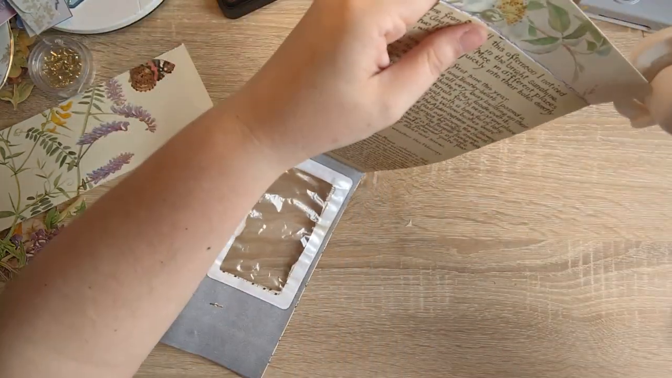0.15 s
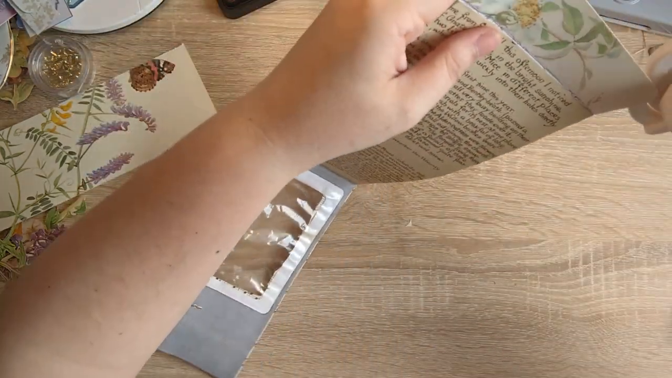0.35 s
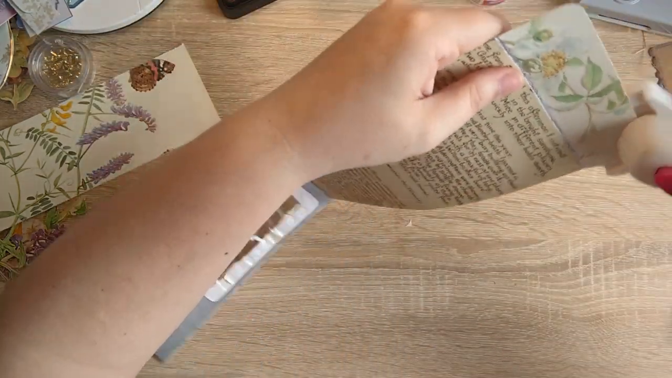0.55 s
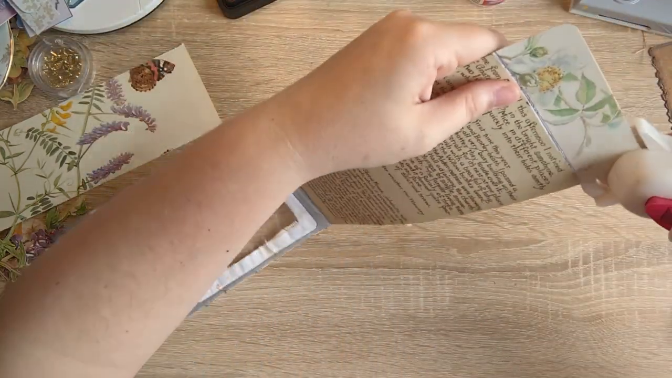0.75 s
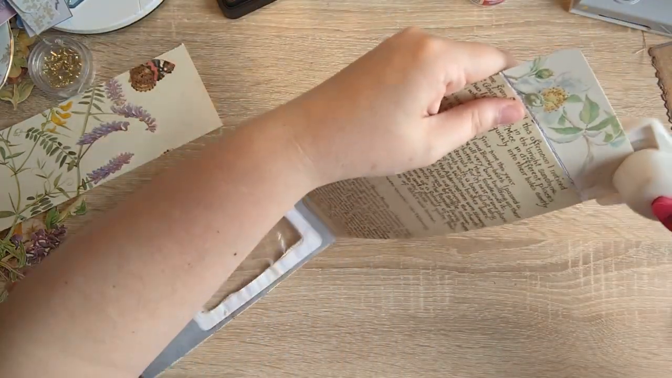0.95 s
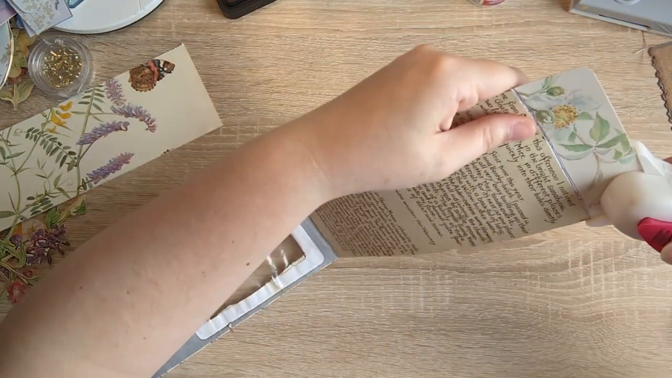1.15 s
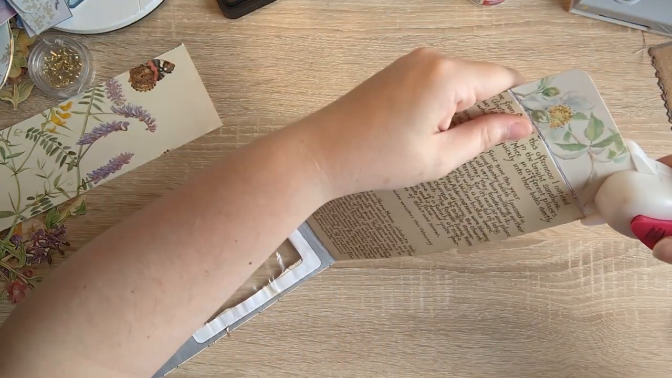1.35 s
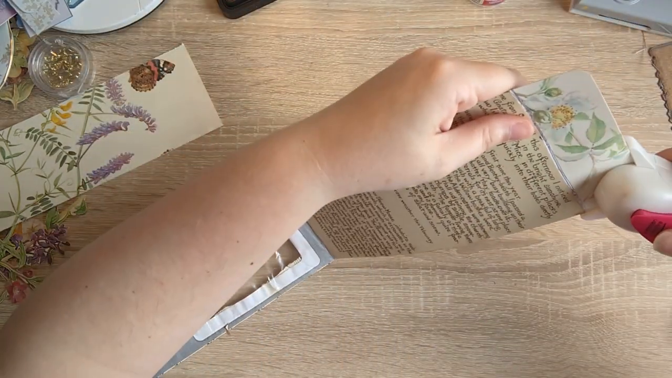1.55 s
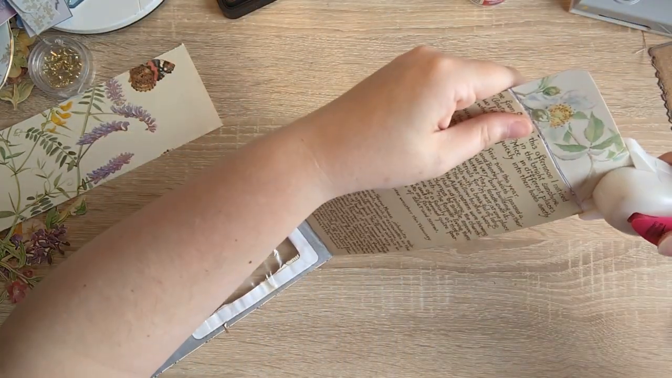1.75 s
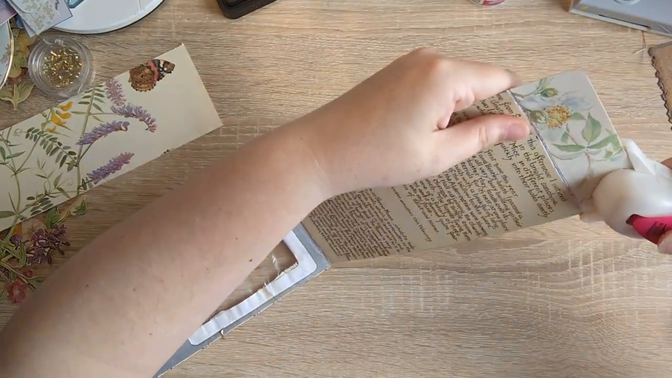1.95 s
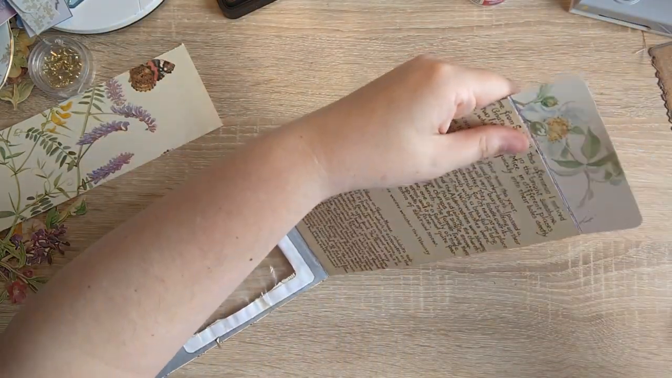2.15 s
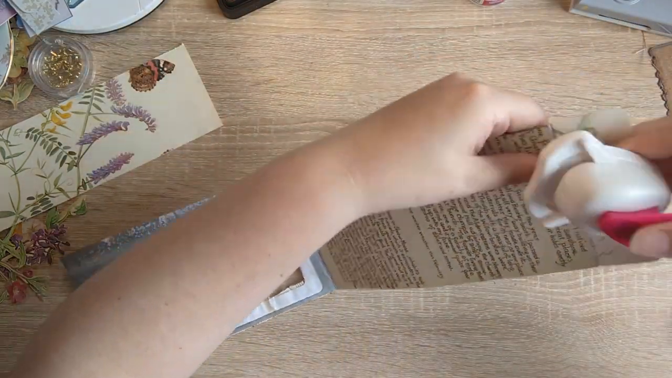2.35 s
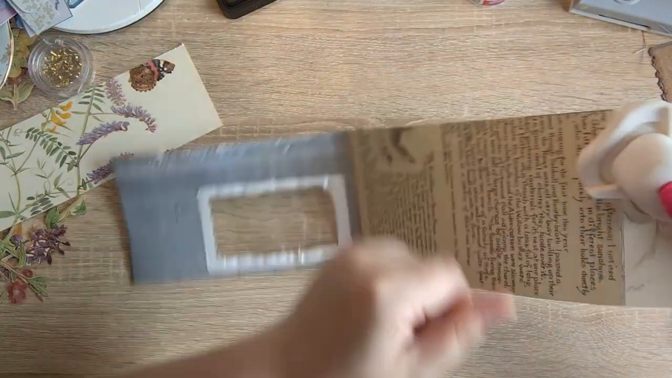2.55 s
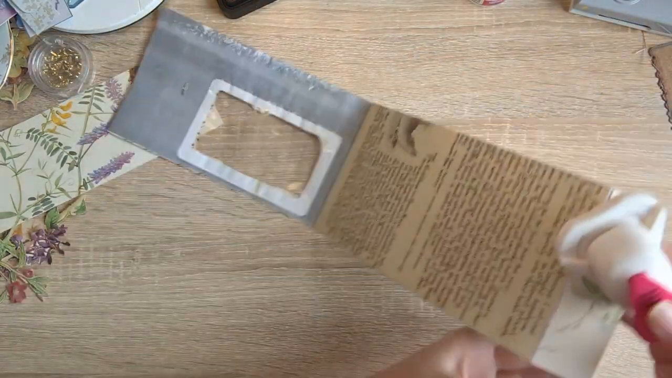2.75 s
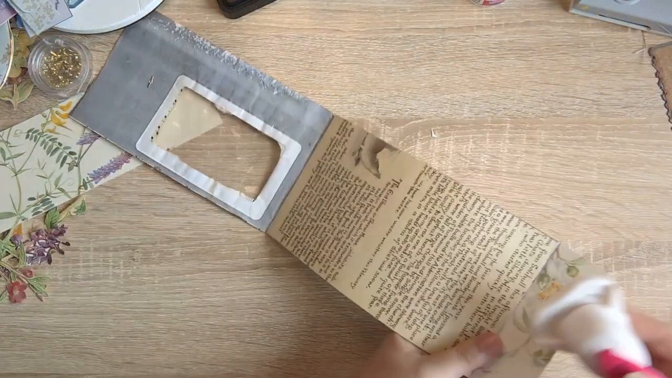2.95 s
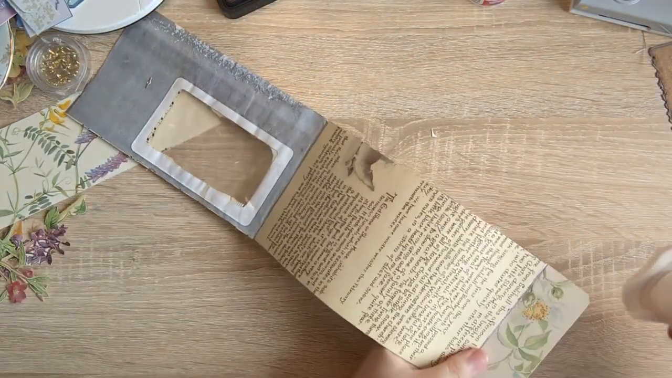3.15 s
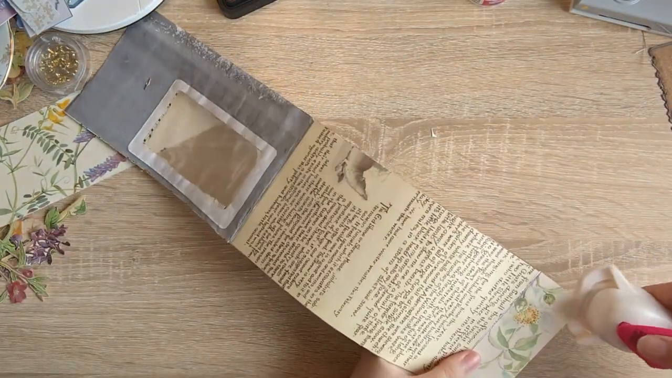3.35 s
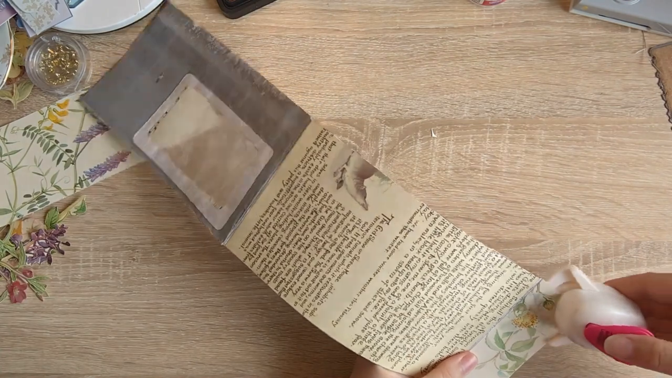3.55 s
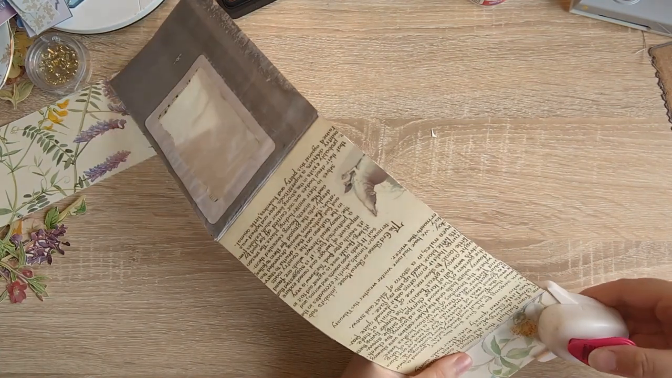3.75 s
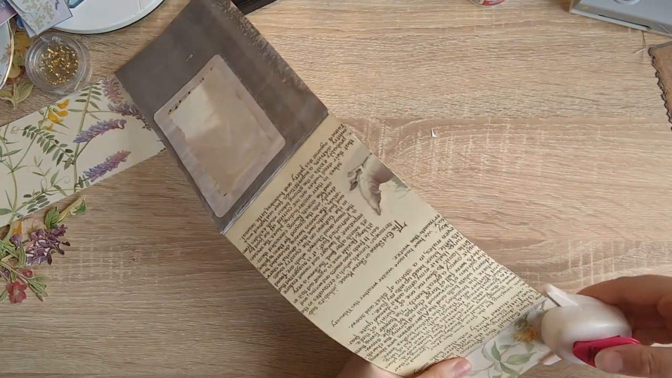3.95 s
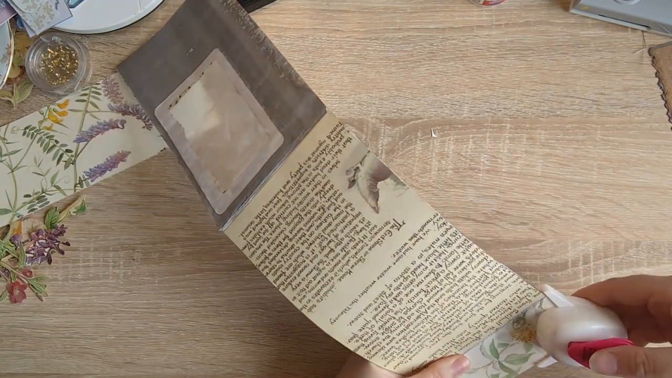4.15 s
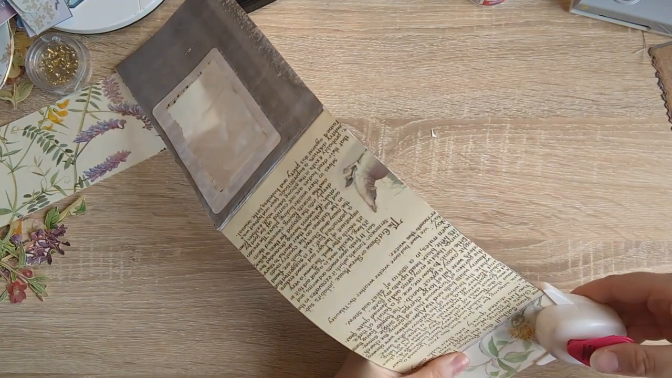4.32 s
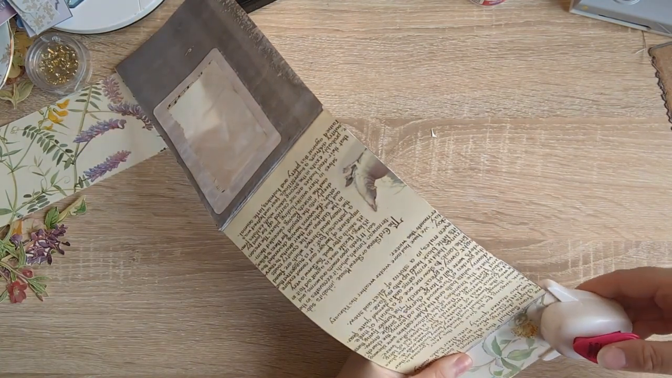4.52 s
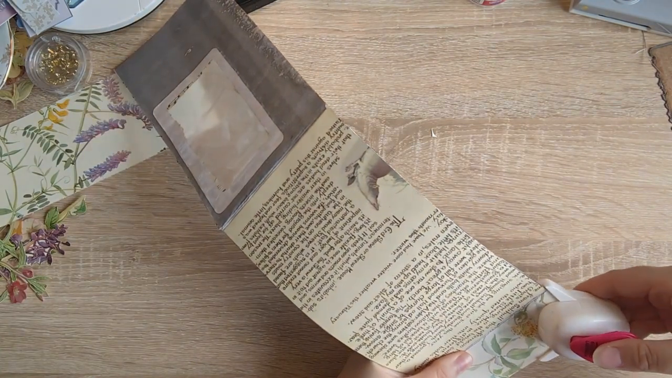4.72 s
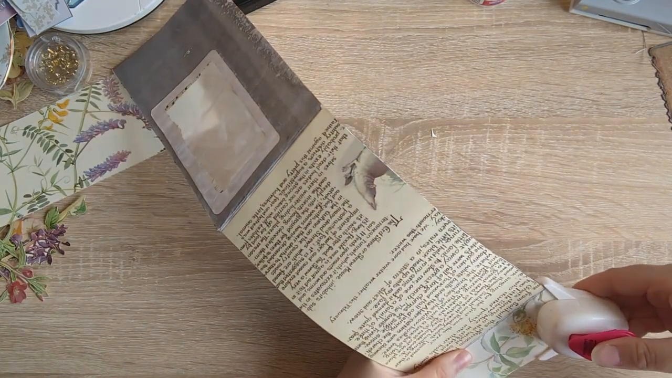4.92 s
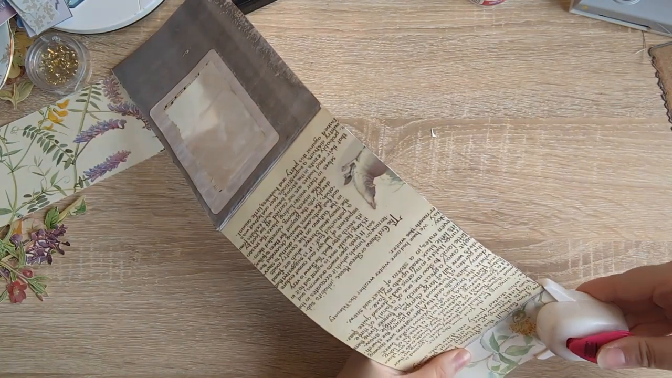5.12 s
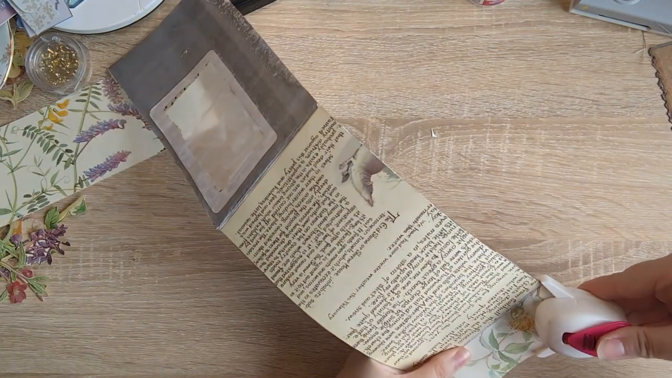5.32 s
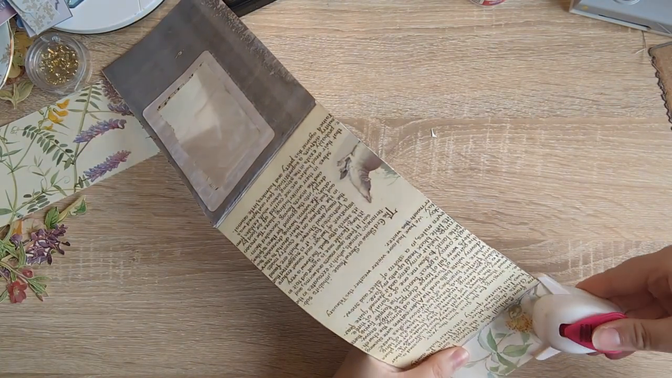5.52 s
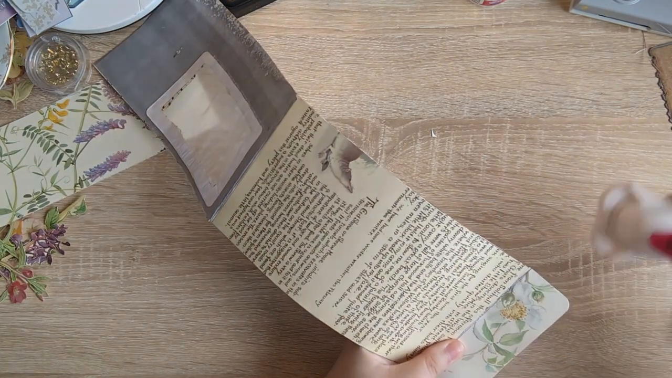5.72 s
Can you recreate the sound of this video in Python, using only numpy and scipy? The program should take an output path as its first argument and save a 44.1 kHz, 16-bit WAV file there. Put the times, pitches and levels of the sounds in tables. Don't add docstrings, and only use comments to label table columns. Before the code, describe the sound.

Close at a desk, stiff paper is fiddled into a plastic punch, clacked loudly, turned with papery snaps, then clacked once more.

```python
import sys
import numpy as np
from scipy import signal
from scipy.fft import rfft, irfft
from scipy.io import wavfile

SR = 44100
rng = np.random.default_rng(int(sys.argv[2]) if len(sys.argv) > 2 else 0)


def ratio(d):
    e = np.asarray(d, float) / 20
    return 10 ** e


def unload_wav(signal):
    wavfile.write(
        sys.argv[1],
        SR,
        np.round(np.clip(np.atleast_2d(signal).T, -1, 1) * 32767).astype(np.int16),
    )


N = 259308

# [t/s, crack level/dB, level beamed at the microphone/dB rel, desk thud/dB rel, crack length/ms]
CUTS = [
    (1.9126, 13, -2.5, -56, 2.1),
    (5.3975, 16, -10.5, -70, 1.12),
]
# [f/Hz, width/Hz, level/dB]
BODY_MODES = [(1750, 680, -2.5), (2250, 790, 0.5), (2740, 640, -1), (3770, 930, -7), (6460, 1900, -8.5)]
# [f/Hz, width/Hz, level/dB]
BLADE_MODES = [(8900, 1400, 0), (11520, 5500, -1), (15400, 1500, 0)]
# [f/Hz, level/dB per Hz]
SHEET_SPECTRUM = [(500, -44.5), (900, -12), (1800, 4), (2400, 4.5), (4200, -6), (5500, -37.5)]
# [f/Hz, level/dB per Hz]
RASP_SPECTRUM = [(2500, -41.5), (4200, -11.5), (5500, -12), (6800, -5.5), (8200, -23.5), (12000, -10.5),
                 (14500, -17), (16000, -13.5)]
# [f/Hz, level/dB per Hz]
HUSH_SPECTRUM = [(15, -82.5), (25, -12), (64, -1), (102, -4.5), (127, -6), (263, -16.5), (363, -14.5),
                 (516, -17), (863, -19), (1230, -8.5), (8140, -17.5), (9840, -16), (16000, -22.5)]
# [f/Hz, t60/s, level/dB]
ROOM_DECAY = [(153, 0.02, 3.5), (460, 0.21, 1.5), (1410, 0.18, 1.5), (3630, 0.22, 0.5), (10000, 0.21, 1),
              (13900, 0.17, 3.5)]
# [t/s, peak level/dB, f/Hz, length/ms]
KNOCKS = [(0.144, -39, 338, 3.2), (0.643, -21.5, 894, 2.3), (0.891, -36.5, 462, 16),
          (0.945, -41.5, 313, 5.5), (1.033, -36.5, 310, 4.8), (1.066, -35.5, 450, 6.7),
          (1.199, -29.5, 295, 6), (1.25, -36, 443, 17), (1.912, -23, 754, 3.5), (1.925, -18.5, 838, 6),
          (2.126, -45, 347, 1.2), (2.177, -50, 450, 4), (2.45, -45.5, 306, 5.3), (2.465, -40, 313, 1.4),
          (2.995, -53, 660, 2.7), (3.033, -42, 794, 4), (3.524, -46.5, 790, 4.9), (3.54, -40, 720, 8.9),
          (3.642, -26.5, 535, 0.63), (3.679, -35, 620, 3.2), (3.746, -32.5, 418, 2.3),
          (3.823, -47.5, 676, 3.9), (3.997, -47, 726, 6), (4.049, -49, 840, 4.5), (4.202, -42.5, 484, 0.37),
          (4.81, -22, 900, 3.9), (5.401, -22.5, 422, 2.8), (5.475, -38.5, 467, 2.7), (5.666, -44, 600, 5.2),
          (5.73, -50.5, 352, 3), (5.761, -47, 375, 6.5), (5.774, -43, 570, 3),
          (0.146, -36.5, 850, 2.6), (0.164, -47.5, 587, 1.3), (0.643, -31.5, 415, 3.7), (0.79, -49, 366, 9),
          (1.917, -22, 305, 2.8), (1.94, -25.5, 820, 7.1), (3.40, -50, 840, 8.7), (4.205, -48, 306, 1.5),
          (4.809, -36.5, 436, 3.4), (5.409, -27, 363, 8.2), (5.476, -34.5, 700, 3)]
# [t/s, peak level/dB, f/Hz, length/ms]
DESK_KNOCKS = [(0.639, -44, 145, 6), (0.889, -52.5, 151, 4), (0.947, -43.5, 159, 3.2),
               (1.033, -40.5, 158, 4.6), (1.069, -45.5, 130, 3.5), (1.197, -38, 174, 2),
               (1.243, -40.5, 142, 3.3), (1.922, -35, 200, 12), (1.958, -44, 214, 14),
               (3.747, -49, 221, 3.3), (4.814, -56, 168.2, 14), (5.403, -49.5, 181, 8)]
# [start t/s, end t/s, f/Hz, width/Hz, level/dB]
SPRING_GLIDES = [
    (0.097, 0.132, 8900, 320, -71),
    (0.284, 0.337, 8800, 355, -69),
    (.43, 0.55, 8900, 350, -75),
    (4.809, 4.9, 6160, 400, -53),
]
# [t/s, peak level/dB, crackle/dB rel, ring f/Hz, length/ms]
SEATING = [(0.0014, -48, -26, 2100, 4.4), (0.1455, -26, -21.5, 2580, 4.3), (0.145, -33.5, -23, 1300, 3),
           (0.2722, -36, -24, 2280, 1.2), (0.4388, -41, -29, 1760, 2.8), (0.587, -42, -25, 1750, 3.8),
           (0.6401, -25, -29.5, 1960, 3.2), (0.6426, -16.5, -32, 2080, 1.1), (0.711, -40, -15, 1760, 3.0),
           (0.723, -32.5, -15.5, 1600, 4.3), (0.7625, -50, -7, 2400, 2.5), (0.784, -26.5, -22.5, 1740, 5.1),
           (0.799, -37, -10, 2000, 4.8), (0.804, -34, -23, 2090, 1.7), (0.8222, -32.5, -13, 2380, 4.1),
           (0.830, -35, -9, 2500, 2.9), (0.8939, -18, -20, 1300, 2.5), (0.915, -23, -10, 1990, 3.3),
           (0.9479, -25, -14.5, 1610, 0.99), (0.967, -29.5, -23, 2190, 3.5),
           (1.0361, -17, -18.5, 1740, 3.2), (1.069, -25.5, -38, 1180, 3.1), (1.0687, -14, -21, 1914, 3.64),
           (1.1922, -29.5, -17.5, 2130, 3.7), (1.2008, -17, -21.5, 1510, 3.1),
           (1.242, -26.5, -3, 2500, 0.56), (1.252, -14.5, -35, 1640, 1.3), (1.2942, -23, -12, 2240, 3.65),
           (1.322, -32.5, -15, 2100, 6.7), (2.1249, -36, -12.5, 1670, 2.8), (2.176, -53.5, -8.5, 1186, 4.1),
           (2.23, -50.5, -12, 2260, 3.2), (2.326, -49.5, -17, 1560, 2.5)]
# [t/s, peak level/dB, crackle/dB rel, ring f/Hz, length/ms]
TURNING = [(2.4516, -45, -22, 1720, 2.5), (2.467, -34.5, -11, 1630, 2.1), (2.475, -32.5, -23, 1980, 1.8),
           (2.500, -35.5, -20.5, 2240, 4.9), (2.531, -34, -17, 2220, 4), (2.536, -28.5, -20, 2060, 1.2),
           (2.57, -38.5, -15.5, 2670, 2.5), (2.587, -47.5, -16, 2900, 4.3), (2.644, -31.5, -17, 2350, 8.3),
           (2.651, -38, -11, 2320, 2.7), (2.655, -28.5, -12.5, 2360, 2), (2.7031, -22, -18, 2300, 2.6),
           (2.764, -46, -11, 3290, 4.5), (2.8, -40, -2.5, 3120, 2.1), (2.839, -42, -4, 2820, 2.8),
           (2.8855, -36.5, -11.5, 2530, 3.3), (2.906, -32, -11.5, 3070, 3.3),
           (2.98, -41.5, -4.5, 3400, 3.1), (3.0074, -33.5, -24, 2500, 1.2), (3.032, -46, -20, 990, 1.9),
           (3.043, -42, -17, 1500, 1), (3.048, -26, -12.5, 2230, 0.32), (3.0741, -22, -15.5, 3100, 2.46),
           (3.084, -36, -17, 2570, 3.6), (3.118, -45, -14, 3620, 0.6), (3.135, -23.5, -18.5, 2900, 2.2),
           (3.1388, -22.5, -10.5, 3080, 2.6), (3.1452, -37, -12, 3280, 2.6), (3.158, -57, -15, 3300, 1.5),
           (3.1805, -40.5, -10, 3320, 1.4), (3.212, -38, -44, 3170, 6.1), (3.2252, -25, -13.5, 2930, 0.5),
           (3.2382, -36.5, -7, 3340, 2.3), (3.3464, -28.5, -19.5, 2080, 3.1), (3.414, -39, -14, 2300, 2.7),
           (3.457, -41.5, -23, 2720, 2.1), (3.4988, -39, -27, 1630, 2.6)]
# [t/s, peak level/dB, crackle/dB rel, ring f/Hz, length/ms]
RESEATING = [(3.525, -29.5, -23, 1780, 2), (3.6423, -15, -32.5, 2020, 1.85), (3.668, -46, -4, 2200, 3.3),
             (3.6807, -34, -17, 1940, 2.5), (3.728, -31, -17.5, 2020, 6.2), (3.746, -17, -29, 2160, 1.9),
             (3.7515, -31, -15, 2430, 1.7), (3.764, -39, -28, 2480, 1.1), (3.811, -40.5, -12.5, 2250, 4.9),
             (3.8236, -33.5, -11.5, 1740, 3.9), (3.838, -42, -4, 1800, 2.1),
             (3.906, -36.5, -21, 1710, 0.58), (3.969, -49, -22, 1750, 1.1),
             (3.991, -38.5, -14.5, 1680, 2.9), (4.048, -39.5, -22.5, 1920, 4.5),
             (4.0842, -32, -17.5, 1800, 2.2), (4.139, -59, -30, 1560, 2.0),
             (4.2022, -23.5, -21.5, 1230, 1.4), (4.208, -26.5, -20, 1780, 2.8),
             (4.23, -35.5, -11, 1750, 1.7), (4.233, -43, -14, 1450, 2), (4.248, -44.5, -15, 1600, 1.5),
             (4.4825, -33.5, -17, 2510, 2), (4.8081, -17.5, -23, 1410, 2.16), (4.874, -46, -30, 1700, 1.1),
             (4.908, -44, -35, 1850, 2), (5.118, -55, -28.5, 1640, 5.2), (5.155, -53, -21.5, 1900, 3),
             (5.617, -49, -35, 1490, 1.3), (5.627, -42.5, -27, 1290, 1.54), (5.6678, -21, -29.5, 1900, 3.2),
             (5.674, -37, -35, 1900, 2.1), (5.748, -32.5, -14, 2220, 1.5), (5.791, -25.5, -17.5, 1880, 4),
             (5.811, -40.5, -8.5, 1830, 3.5), (5.8568, -41, -12, 2450, 1.2)]
STAGE_PAN_DB = (2.0, 4, 3.2)
# [start t/s, end t/s, sheet level/dB, rasp/dB rel, drag/dB rel]
STROKES = [(0.092, 0.608, -67.5, -4, -13.5), (0.611, 0.726, -58, -4.5, -30), (0.807, 0.81, -47, -5, -12),
           (0.873, 1.057, -60.5, -1.5, -23), (1.08, 1.087, -63.5, 18, -9), (1.21, 1.29, -45, -7.5, -13),
           (2.094, 2.136, -50.5, -4.5, -7.5), (2.18, 2.45, -67.5, -4, -20), (2.46, 2.534, -59, -7, -9),
           (2.637, 2.985, -60, 3, -23), (2.972, 3.067, -58, -1.5, -4.5), (3.076, 3.137, -69, 8, 3),
           (3.433, 3.544, -59.5, -8.5, -6.5), (3.53, 3.63, -64, -12, 4), (3.656, 3.74, -57, 0, 6),
           (3.815, 3.896, -55.5, -17, -6), (3.936, 4.144, -60, -10.5, -10), (4.634, 4.698, -63, -7, -10),
           (4.813, 4.815, -50, -7, -9), (5.496, 5.6, -60, -18.5, -28), (5.728, 5.78, -46.5, -5, -11),
           (5.812, 5.86, -77, -7, -18)]
# Sheet, rasp and drag while the hands only hold on [level/dB]
AT_REST_DB = (-83.5, -80.5, -86)
# [start t/s, end t/s, level/dB]
SHAKES = [(0.175, 0.163, -68.5), (0.647, 0.71, -63), (0.788, 0.934, -67.5), (1.07, 1.1, -61.5),
          (1.222, 1.278, -58), (1.96, 2.015, -64.5), (2.146, 2.16, -63), (2.36, 2.374, -72),
          (2.468, 2.48, -59), (2.984, 3.086, -66.5), (3.53, 3.597, -65), (3.656, 3.787, -64.5),
          (3.974, 4.027, -69.5), (4.135, 4.137, -66.5), (4.22, 4.248, -67.5), (4.817, 4.824, -66),
          (5.437, 5.44, -58), (5.682, 5.69, -65.5), (5.757, 5.778, -65.5)]

FIRST_BREAK = 6.5


def rms_one(x):
    return x / np.sqrt(np.mean(x ** 2) + 1e-20)


def peak_one(x):
    return x / np.abs(x[0]).max()


def band(x, low_hz, high_hz):
    return signal.sosfilt(signal.butter(2, [low_hz, high_hz], "band", fs=SR, output="sos"), x)


def steep(x, low_hz, high_hz):
    return band(band(x, low_hz, high_hz), low_hz, high_hz)


def resonance(x, hz, width_hz):
    r = np.exp(-np.pi * max(width_hz, 20) / SR)
    feedback = [1, -2 * r * np.cos(2 * np.pi * hz / SR), r * r]
    return signal.lfilter(np.array([1, 0, -1]) * (1 - r * r) / 2, feedback, x)


def modes(blow, table):
    return sum((-1) ** k * ratio(db) * resonance(blow, hz, width_hz)
               for k, (hz, width_hz, db) in enumerate(table))


def coloured(x, spectrum):
    hz, level_db = np.transpose(spectrum)
    grid = np.maximum(np.fft.rfftfreq(N, 1 / SR), 1)
    gain = ratio(np.interp(np.log(grid), np.log(hz), level_db))
    return rms_one(irfft(rfft(x) * gain, N))


def drift(rate):
    r = np.exp(-2 * np.pi * rate / SR)
    return rms_one(signal.lfilter([1], [1, -2 * r, r * r], rng.standard_normal(N + SR))[SR:])


def gesture(start, end, level_db, rest_db, rise, fall):
    t = np.arange(0, N + 64, 64) / SR
    climb = rise * np.maximum(start[:, None] - t, 0)
    sink = fall * np.maximum(t - end[:, None], 0)
    each = level_db[:, None] - climb - sink
    return np.interp(np.arange(N) / SR, t, np.maximum(each.max(axis=0), rest_db))


def burst(noise, length_ms, rise_ms):
    ms = np.arange(len(noise)) * 1000 / SR
    first_break = 0.099 * np.exp(-ms / 0.16)
    decay = np.exp(-ms / max(length_ms, .2)) + first_break
    shower = noise * np.abs(noise) ** 0.34 * (1 - np.exp(-ms / rise_ms)) * decay
    even = 0.048 * shower
    even[0] = np.sqrt(np.sum(shower ** 2))
    return np.array([shower, even])


def add(out, s, x, pan_db=2.5):
    left_s = s + .00005 * (4.0 - pan_db / 2)
    sounds = [x[0] * ratio(pan_db / 2), x[0] * ratio(-pan_db / 2), x[1]]
    for row, sound, at in zip(out, sounds, [left_s, s, s]):
        i = round(at * SR)
        row[i:i + len(sound)] += sound[:N - i]


def background(rumble_db):
    common, left, right, *low = rng.standard_normal((6, N))
    shared = band(common, 25, 520)
    hush = np.array([coloured(shared + v - 0.36 * band(v, 17, 400), HUSH_SPECTRUM) for v in (left, right)])
    apart = np.array(low[1:])
    both = rms_one(band(low[0], 100, 170)) * ratio([[-1.5], [1.5]])
    middle = 0.95 * rms_one(band(apart, 55, 160))
    deep = 0.68 * rms_one(band(apart, 31, 96)) * ratio([[-8], [2.5]])
    rumble = ratio(rumble_db + 2.0 * drift(9)) * (both + middle + deep)
    return ratio(-65.5) * band(hush, 12, 13000) + rumble


def room(x):
    t, white = np.arange(SR // 2) / SR, rng.standard_normal((2, 2, SR // 2))
    hz, t60, level_db = np.transpose(ROOM_DECAY)
    edges, echoes = 60 * 2 ** np.arange(0, 8.3, .75), 0
    for k, (low, high) in enumerate(zip(edges, np.append(edges[1:], 19000))):
        centre = np.log(low * high) / 2
        start_db = np.interp(centre, np.log(hz), level_db)
        decay_db = 60 * t / np.interp(centre, np.log(hz), t60)
        mid, side = band(white[k % 2], low, high) * ratio(start_db - decay_db)
        alike = np.clip(1 - np.exp(centre) / 1100, 0, 1)
        echoes = echoes + np.sqrt(1 + alike) * mid + np.sqrt(1 - alike) * side * [[1], [-1]]
    echoes = echoes * np.clip((t - 0.001) / 0.0063, 0.05, 1)
    echoes = echoes / np.sqrt(np.sum(echoes ** 2) / 2)
    return signal.fftconvolve(x[None], echoes, axes=1)[:, :N]


def off_desk(x):
    desk = 0.04 * np.roll(x, round(0.0013 * SR), axis=1)
    wall = np.array([np.roll(side, round(lag_s * SR)) for side, lag_s in zip(x, (0.0068, 0.0064))])
    return x + desk + ratio(-15) * band(wall, 1100, 9000)


def spring():
    out, t = np.zeros(N), np.arange(N) / SR
    noise = rng.standard_normal(N)
    for start, end, pitch_hz, width_hz, level_db in SPRING_GLIDES:
        shape = np.interp(t, [start, start + 0.052 * (end - start), end], [0, 1, 0])
        squeak = resonance(resonance(noise, pitch_hz, width_hz), pitch_hz, 0.52 * width_hz)
        out += ratio(level_db) * shape * rms_one(squeak)
    return out


def rubbing(sheet_db, rasp_db, drag_db):
    clumps = ratio(2.5 * drift(25) + 2.5 * drift(80))
    born = rng.random(N) < 2500 * clumps / SR
    sizes = ratio(6.1 * np.minimum(rng.exponential(1, N), 3.0))
    grains = born * sizes * rng.choice([-1, 1], N)
    friction = clumps * (0.81 * rms_one(grains) + rng.standard_normal(N))
    sheet = ratio(sheet_db) * coloured(friction, SHEET_SPECTRUM)
    rasp = ratio(rasp_db + 2.5) * coloured(friction, RASP_SPECTRUM)
    drag = ratio(drag_db - 2) * rms_one(steep(friction, 420, 2300))
    return sheet + rasp + drag


def knocks():
    rows = KNOCKS + DESK_KNOCKS
    out, noise = np.zeros((3, N)), rng.standard_normal((len(rows), 3000))
    for (s, peak_db, pitch_hz, length_ms), grit in zip(rows, noise):
        blow = burst(grit, length_ms, 1.0) * ratio([[0], [-5]])
        hollow = resonance(resonance(blow, pitch_hz, .4 * pitch_hz), pitch_hz, .9 * pitch_hz)
        hollow = hollow + 0.077 * steep(blow, .5 * pitch_hz, 3.5 * pitch_hz)
        add(out, s - .001, ratio(peak_db - 0.5) * peak_one(hollow), pan_db=1.5)
    return out


def snaps():
    stages = zip([SEATING, TURNING, RESEATING], STAGE_PAN_DB)
    rows = [(*row, middling_pan_db) for table, middling_pan_db in stages for row in table]
    out, noise = np.zeros((3, N)), rng.standard_normal((len(rows), 2000))
    noise = np.clip(noise, -2, 2)
    noise[:, 26] = FIRST_BREAK
    for (s, peak_db, high_db, ring_hz, length_ms, middling_pan_db), grit in zip(rows, noise):
        pan_db = middling_pan_db - 0.52 * (peak_db + 30)
        blow = burst(grit, length_ms, 0.5 * length_ms) * ratio([[0], [-4]])
        ring = resonance(resonance(blow, ring_hz, 0.71 * ring_hz), ring_hz, 0.66 * ring_hz)
        ring = band(ring + 0.07 * steep(blow, 950, 5050), 610, 3020)
        crackle = band(band(blow, 2570, 19840), 3550, 13420)
        snap = peak_one(ring) + ratio(high_db + 17.5) * peak_one(crackle)
        add(out, s - .0006, ratio(peak_db + 1.5) * snap, pan_db)
    return out


def punch():
    out, noise = np.zeros((3, N)), rng.standard_normal((len(CUTS), 8000))
    noise = np.clip(noise, -2, 2)
    noise[:, 30] = .6 * FIRST_BREAK
    for (s, crack_db, beamed_db, thud_db, length_ms), grit in zip(CUTS, noise):
        blow = burst(grit, length_ms, 0.51)
        body = peak_one(band(modes(blow, BODY_MODES), 750, 14000))
        blade = peak_one(modes(blow, BLADE_MODES))
        crack = ratio([[beamed_db], [0]]) * (ratio(-6.5) * body + ratio(-4) * blade)
        add(out, s, ratio(crack_db) * crack)
        thud = peak_one(resonance(resonance(np.abs(blow), 60, 30), 60, 40))
        thud = thud * [[1], [0]]
        add(out, s, ratio(crack_db + thud_db) * thud, pan_db=-14.5)
        before_ms = np.arange(-800, 0) * 1000 / SR
        bright_hiss = ratio(-56) * steep(grit[-800:], 8500, 16000) * np.clip((before_ms + 16) / 3, 0, 1)
        broad_swell = ratio(-56.5 + 2.8 * before_ms) * band(grit[-800:], 1200, 14000)
        lead_in = bright_hiss + ratio(-1.5 * beamed_db) * broad_swell
        add(out, s - 800 / SR, ratio(crack_db) * lead_in * [[1], [0]])
    return out


def scene():
    start, end, sheet_db, rasp_db, drag_db = np.transpose(STROKES)
    rub = [gesture(start, end, sheet_db + rel_db, rest_db, rise=222.5, fall=294)
           for rel_db, rest_db in zip([0, rasp_db, drag_db], AT_REST_DB)]
    shake_db = gesture(*np.transpose(SHAKES), rest_db=-82.5, rise=305, fall=177.5)
    desk = punch() + snaps() + knocks() + rubbing(*rub) + spring()
    return off_desk(desk[:2]) + ratio(1) * room(desk[2]) + background(shake_db)


def low_pass(x):
    return signal.sosfilt(signal.butter(12, 16320, fs=SR, output="sos"), x)


def record(dry):
    limit_db, release_db_per_s, ahead_s, smooth_s = -2, 898.5, .0001, 0.0025
    over_db = np.maximum(20 * np.log10(np.abs(dry).max(axis=0) + 1e-9) - limit_db, 0)
    ramp = release_db_per_s * np.arange(N) / SR
    held = np.maximum.accumulate(over_db + ramp) - ramp
    r = np.exp(-1 / (smooth_s * SR))
    duck_db = np.roll(signal.lfilter([1 - r], [1, -r], held), -round(ahead_s * SR))
    x = np.clip(dry * ratio([[-.6], [.6]]) * ratio(-duck_db), -1, 1)
    x = signal.sosfilt(signal.ellip(10, 1, 60, 15900, fs=SR, output="sos"), x)
    return low_pass(x)


dry = scene()
out = record(dry)
unload_wav(out)
```